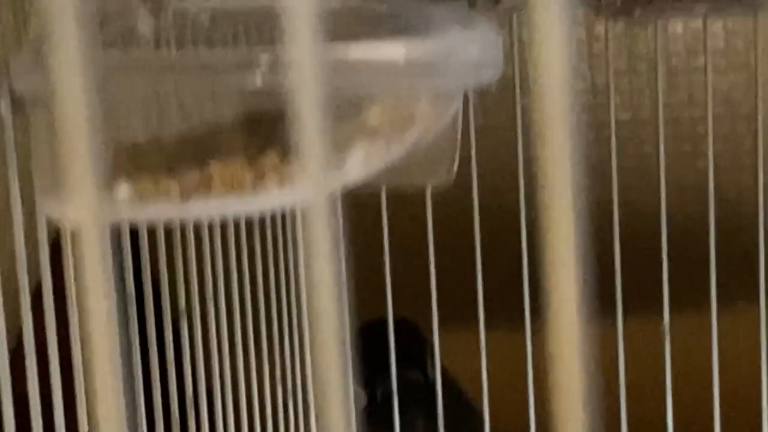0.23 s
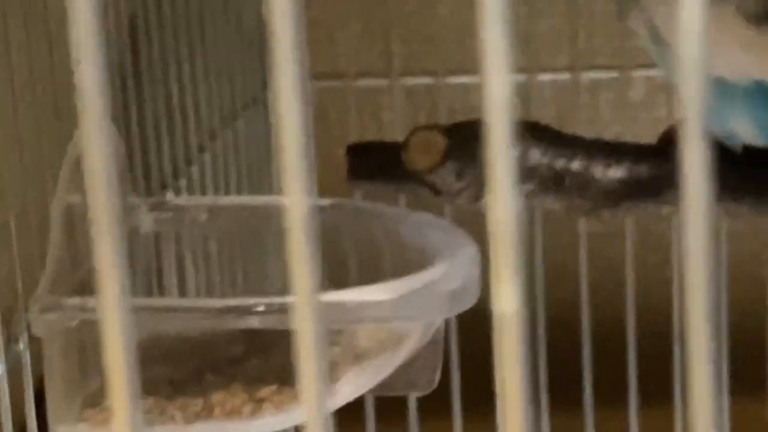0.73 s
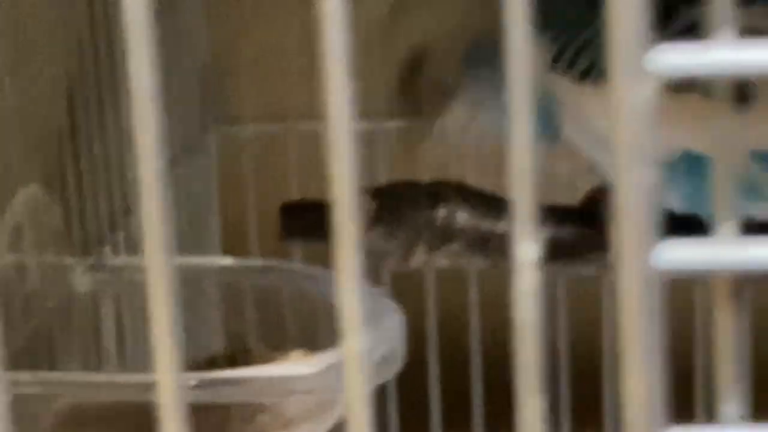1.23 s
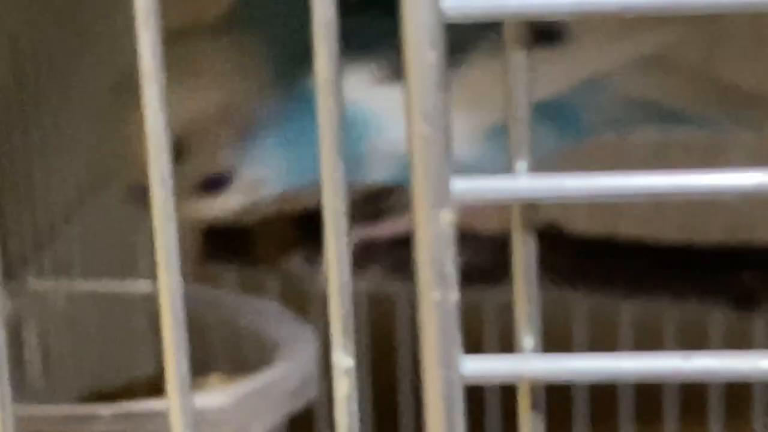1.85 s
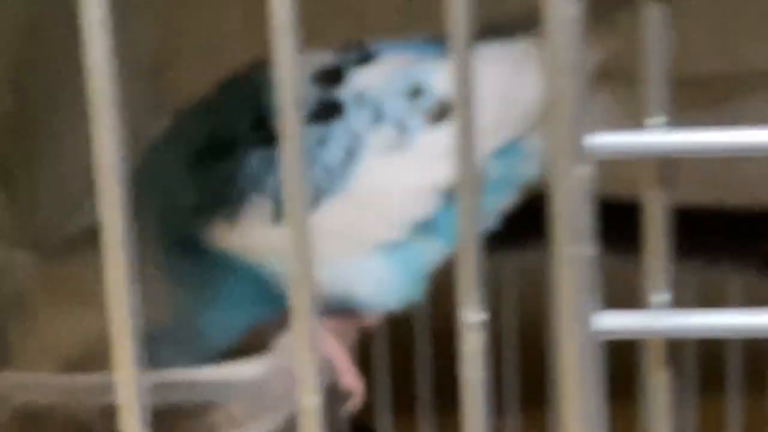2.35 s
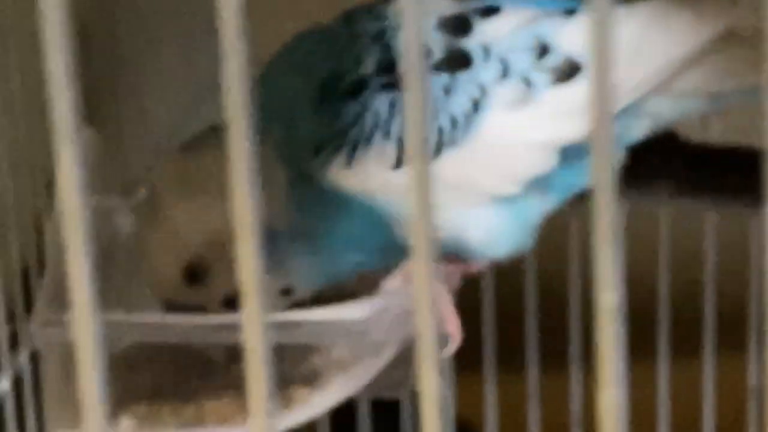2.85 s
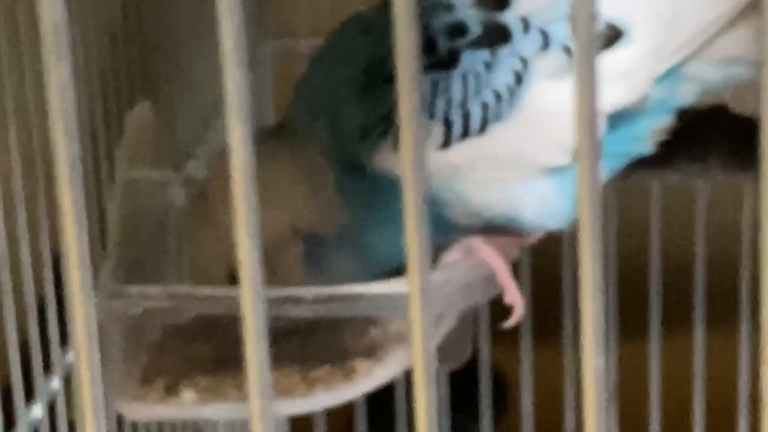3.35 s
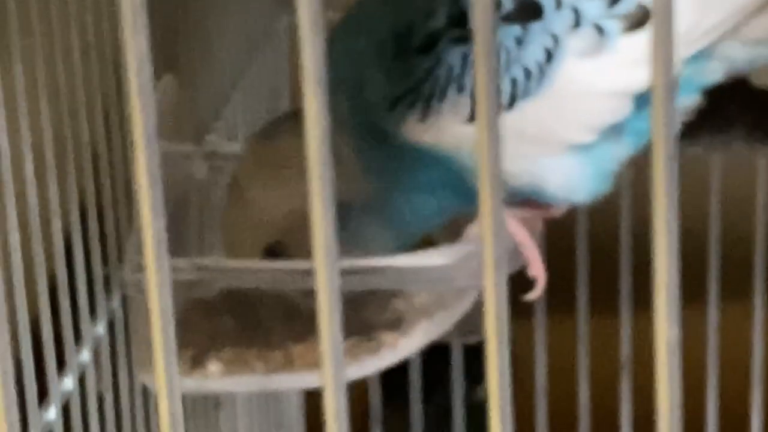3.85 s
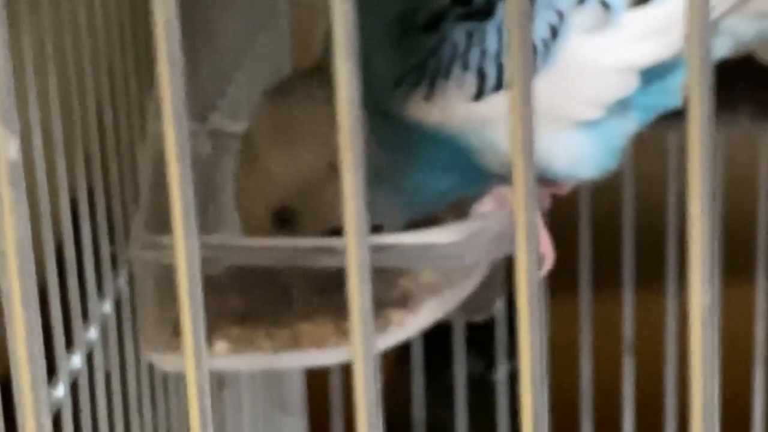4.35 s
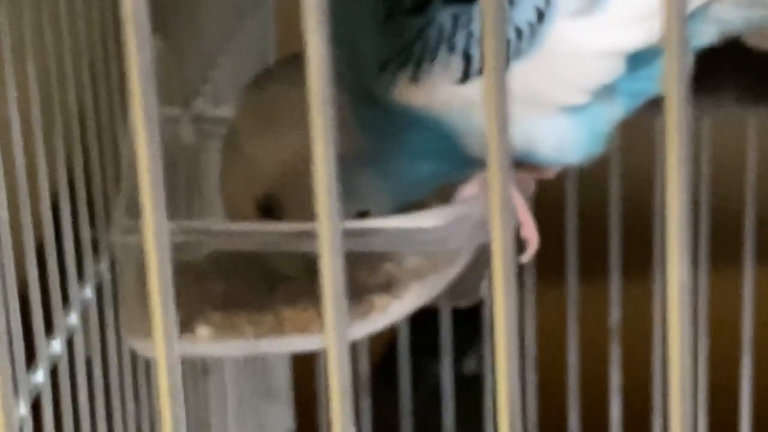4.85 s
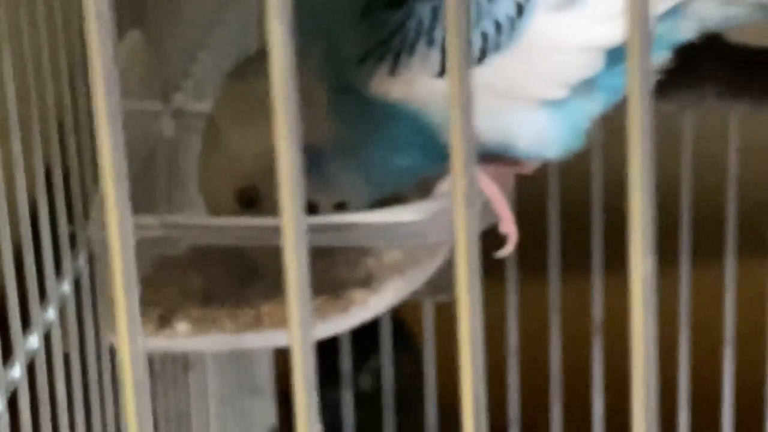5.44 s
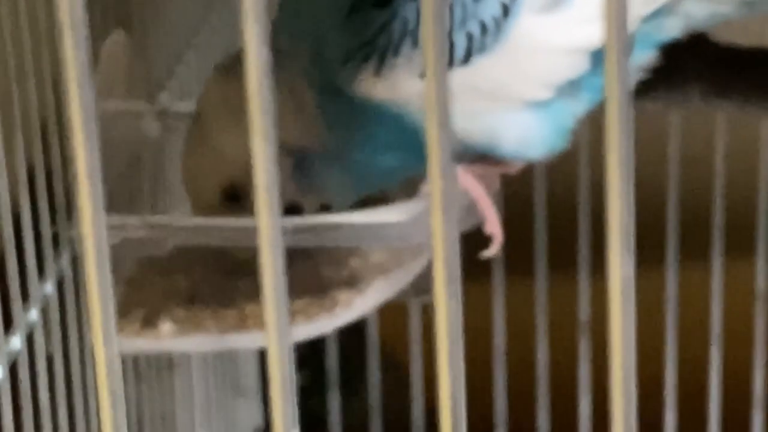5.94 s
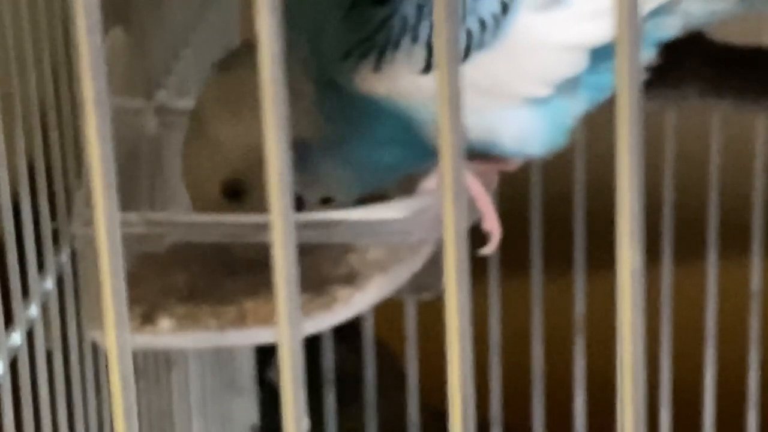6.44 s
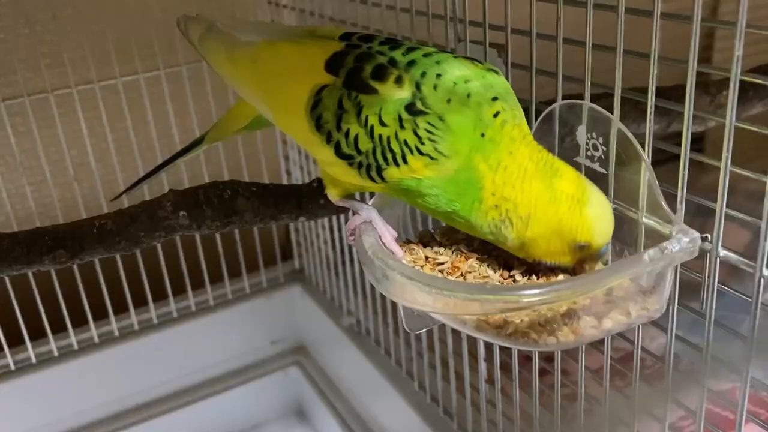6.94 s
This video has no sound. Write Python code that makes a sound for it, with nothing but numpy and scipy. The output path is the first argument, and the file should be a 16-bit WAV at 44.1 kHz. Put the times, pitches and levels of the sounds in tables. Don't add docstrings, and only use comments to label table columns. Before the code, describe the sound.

A quiet home room with faint, lumpy low rumble, heard from a phone close to a wire cage. From 0.2 s claws shuffle and wire walls knock and buzz lightly, with more rattles at 0.7-0.9 s. At 1.02 s a hard metallic clank lands with two tiny harsh, raspy squawks, the second louder and brighter at about 1.17 s, followed by a rush of sliding seed. Another strong cage knock comes at 1.5 s. Around 1.9-2.7 s crisp husk crackles, small wire knocks and claw scuffles mix. Then feeding: irregular sharp beak taps on thin plastic, strong near 3.05, 4.36 and 6.3 s, with light nibbles, ticks and short seed drags between. Tray thumps at 5.44 and hardest at 5.53 s leave a low hum; firm knocks follow at 5.97 and 6.26 s. The rumble drops after 6.9 s, with a last bright knock and seed rustle at 7.1 s.

```python
import sys
import numpy as np
from scipy import signal
from scipy.fft import rfft, irfft
from scipy.io import wavfile
from scipy.ndimage import uniform_filter1d

SR = 44100
rng = np.random.default_rng(int(sys.argv[2]) if len(sys.argv) > 2 else 0)


def to_linear_factor(level_db):
    exponent = np.asarray(level_db, float) / 20
    return 10 ** exponent


def output_pcm(signal):
    pcm = np.clip(np.atleast_2d(signal).T, -1, 1) * 32767
    wavfile.write(sys.argv[1], SR, np.round(pcm).astype(np.int16))


N = 316638

# f/Hz, level/dB [dB per Hz]
HUSK_SPECTRUM = [(5000, -32), (7500, -7), (9000, -3), (12000, -4), (14000, -6.5), (15600, -4), (16300, -20),
                 (16800, -39)]
# f/Hz, width/Hz, level/dB
WIRE_MODES = [(578, 53, -4.5), (763, 91, 0), (966, 30, -9), (1214, 53, 0), (1560, 92, -10.5),
              (1790, 150, -3), (2630, 50, 0.5), (3030, 61, 2.5), (3282, 35, 3), (3710, 78.5, -1.5),
              (4720, 60, 0.5), (2039, 15, -2.5), (2500, 22, -2), (3490, 35, 0)]
# f/Hz, width/Hz, level/dB
TRAY_MODES = [(336.3, 31, 2), (569, 29, 3), (1017, 76, -9), (1189, 98, 0), (1696, 31, -8), (2160, 39, -10),
              (2620, 28, -0.5), (3066, 45, -11), (4680, 56, -2), (957, 39, -2), (1367, 24, -6),
              (3500, 52, -6), (763, 28, -7.5)]


def evened(x):
    return x / np.sqrt(np.mean(x ** 2) + 1e-20)


def read(points, hz):
    f, value = np.transpose(points)
    return np.interp(np.log(hz + 1), np.log(f + 1), value)


def curve(rows, size, start):
    s, *columns = np.transpose(rows)
    return [np.interp(start + np.arange(size) / SR, s, c) for c in columns]


def add(mix, s, sound):
    part = mix[..., round(s * SR):][..., :sound.shape[-1]]
    part += sound[..., :part.shape[-1]]


def coloured(x, points):
    gain_db = np.maximum(read(points, abs(np.fft.fftfreq(4096, 1 / SR))), -90)
    log_gain = np.log(to_linear_factor(gain_db))
    taps = np.fft.ifft(np.exp(np.conj(signal.hilbert(log_gain)))).real[:2048]
    return signal.oaconvolve(x, taps / np.linalg.norm(taps))[:len(x)]


def resonate(x, hz, width):
    r = np.exp(-np.pi * width / SR)
    if np.ndim(hz) == 0:
        pull = r * np.cos(2 * np.pi * hz / SR)
        return signal.lfilter([2 * (1 - r), -2 * (1 - r) * pull], [1, -2 * pull, r ** 2], x)
    turn = np.exp(2j * np.pi * np.cumsum(hz) / SR)
    return 2 * (turn * signal.lfilter([1 - r], [1, -r], x / turn)).real


def body(x, modes):
    return sum((-1) ** k * to_linear_factor(db) * resonate(x, hz, width) for k, (hz, width, db) in enumerate(modes))


def lumps(size, count):
    smooth = uniform_filter1d(rng.standard_normal(size), count)
    return evened(uniform_filter1d(smooth, count))


def grains(per_s, spread_db, hiss):
    size = to_linear_factor(spread_db * np.minimum(rng.exponential(1, N), 5)) * rng.choice([-1., 1.], N)
    clicks = size * (rng.random(N) < per_s / SR)
    return evened(evened(clicks) + hiss * rng.standard_normal(N))


def moves():
    # t/s, length/s, claws on tray level/dB, jolt through the stand level/dB
    shifts = [(0.195, 0.4, -68, -59.5), (0.793, 0.31, -65, -59.5), (1, 0.24, -62, -67),
              (1.268, 0.39, -58.5, -55), (1.694, 0.35, -69, -75), (1.915, 0.3, -60.5, -55),
              (2.159, 0.37, -61.5, -61), (2.562, 0.15, -71, -63), (2.665, 0.61, -71.5, -57.5),
              (3.188, 0.19, -59.5, -54), (3.301, 0.37, -60, -51.5), (3.837, .1, -83.5, -52.5),
              (3.943, 0.2, -67, -65), (4.244, 0.18, -73.5, -78), (5.423, 0.32, -57, -59.5),
              (5.826, 0.17, -78.5, -55), (5.976, 0.56, -68, -61), (6.905, 0.17, -72.5, -73),
              (7.107, .1, -68, -75), (5.03, 0.095, -70.5, -77.5)]
    rise_s, fade_db = 0.018, -10
    out = np.zeros((2, N))
    for s, length, claws_db, jolt_db in shifts:
        t = np.arange(round(1.5 * length * SR)) / SR
        shape = np.clip(np.minimum(t / rise_s, (1.3 - t / length) / 0.31), 0, 1)
        shape = shape * to_linear_factor(fade_db * t / length)
        add(out, s, to_linear_factor(np.array([[claws_db], [jolt_db]])) * shape)
    return out


def background():
    # f/Hz, level/dB [dB per Hz]
    rumble_spectrum = [(12, -51), (20, -22), (44, -2.5), (68, 1), (123, -6.5), (157, -20), (325, -28),
                       (387, -32), (500, -28.5), (650, -54.5), (1100, -120)]
    # f/Hz, level/dB [dB per Hz]
    scuffle_spectrum = [(71, -33.5), (120, 0.5), (220, -4), (550, -13.5), (637, -17), (738, -8.5),
                        (884, -12.5), (1540, -17.5), (3440, -34), (6000, -53.5), (7800, -67.5),
                        (13200, -120)]
    still_rumble_db, still_tray_db = -63, -80
    quiet_from_s, quiet_db = 6.88, -13
    claws, jolts = moves()
    quieting = np.clip((np.arange(N) / SR - quiet_from_s) / 0.083, 0, 1)
    house = to_linear_factor(still_rumble_db + quiet_db * quieting)
    noise = rng.standard_normal((4, N))
    rumble = [coloured(n, rumble_spectrum) * np.hypot(house, jolts) * to_linear_factor(1.6 * lumps(N, count=1500))
              for n in noise[:2]]
    scuffle = np.array([coloured(n + 0.2 * evened(body(n, WIRE_MODES[:6])), scuffle_spectrum)
                        for n in noise[2:]])
    scuffle = scuffle * np.hypot(to_linear_factor(still_tray_db), claws) * to_linear_factor(1.5 * lumps(N, count=700))
    return rumble + scuffle


def hum(s, length, db, fade_db, modes):
    size = round(length * SR)
    level = to_linear_factor(db + fade_db * np.arange(size) / size + 4.2 * lumps(size, count=500))
    level = level * signal.windows.tukey(size, .05)
    buzz = []
    for n in rng.standard_normal((2, size)):
        once = body(n, modes)
        narrow = evened(body(once, modes))
        buzz.append(evened(narrow + .5 * evened(once)) * level)
    return s, np.array(buzz)


def loose_parts():
    # f/Hz, width/Hz, level/dB
    bars = [(245, 110, 1), (680, 38, 3.5), (765, 60, 2.5), (1490, 65, -2), (1590, 37, -3), (1860, 30, -13),
            (2600, 84, -4)]
    starts = [.195, 1.775, 1.254, 2.895, 5.45, 5.968, 5.44]
    # length/s, level/dB, fade level/dB
    hums = [
        (0.091, -65, -7),
        (0.071, -60.5, -12),
        (0.32, -56.5, -8),
        (.08, -71, -16),
        (.6, -64, -16),
        (0.2, -61, -16.5),
        (.5, -58.5, -16),
    ]
    parts = bars[1:], bars[1:], bars, bars[3:5], TRAY_MODES[2:4], TRAY_MODES[1:2], TRAY_MODES[:1]
    out = np.zeros((2, N))
    for s, row, modes in zip(starts, hums, parts):
        add(out, *hum(s, *row, modes))
    return out


def seeds():
    # f/Hz, level/dB [dB per Hz]
    seed_spectrum = [(700, -41), (1200, -8.5), (1700, -1.5), (2190, 0.5), (2600, -6.5), (5000, -5),
                     (8000, -11), (9500, -42.5)]
    # t/s, length/s, seed level/dB, husk fizz level/dB
    shuffles = [(1.936, 0.11, -65, -78), (0.856, 0.11, -71, -88), (0.24, 0.9, -88, -89),
                (0.594, 0.56, -85, -99), (2.722, 0.074, -71, -81), (2.877, 0.1, -75.5, -85.5),
                (4.01, 0.094, -73, -86), (4.361, 0.081, -72.5, -79), (5.29, 0.21, -76.5, -87),
                (5.55, 0.051, -83, -90), (6.36, 0.088, -74, -89), (1.073, 0.1, -58, -92),
                (1.18, 0.36, -53.5, -76), (1.685, 0.47, -74, -78), (1.917, 0.082, -67.5, -56),
                (2.061, 0.059, -75, -60.5), (2.129, 0.11, -64, -70), (2.279, 0.11, -55.5, -77),
                (3.271, 0.12, -63.5, -92), (3.624, 0.042, -68.5, -70.5), (3.799, 0.089, -69.5, -79.5),
                (3.886, 0.061, -69, -81), (4.183, 0.11, -65, -75), (4.51, 0.1, -66, -74.5),
                (4.702, 0.054, -100, -80), (4.847, 0.059, -74, -72.5), (4.959, 0.16, -70, -76),
                (5.53, 0.024, -80, -69), (5.66, 0.086, -68, -69), (5.866, 0.042, -67.5, -79),
                (6.039, 0.059, -58, -72), (6.159, 0.075, -66.5, -72), (6.305, 0.029, -66.5, -74),
                (6.531, 0.072, -63, -79), (6.711, 0.064, -71, -87), (6.897, 0.17, -66.5, -69),
                (7.098, 0.086, -57.5, -61.5)]
    still_wires_db, rustle_db, hiss_db = -87, -24.5, -89
    stir = to_linear_factor(still_wires_db) + to_linear_factor(rustle_db) * moves()[0]
    fizz = np.full(N, to_linear_factor(hiss_db))
    for s, length, seed_db, husk_db in shuffles:
        t = np.arange(round(length * SR)) / SR
        drag = signal.windows.tukey(len(t), .5) * to_linear_factor(4.5 - 17.0 * t / length)
        add(stir, s, to_linear_factor(seed_db - 9.0) * drag)
        add(fizz, s, to_linear_factor(husk_db - 2.5) * drag)
    flicker = to_linear_factor(1.6 * np.array([lumps(N, count=500), lumps(N, count=500)]))
    slide = grains(900, 3.5, hiss=4.4)
    slide = slide + 0.14 * evened(body(slide, WIRE_MODES[5:]))
    crackle = grains(1200, 3.0, hiss=2.2)
    sliding = flicker[0] * coloured(slide, seed_spectrum) * stir
    return sliding + flicker[1] * coloured(crackle, HUSK_SPECTRUM) * fizz


def knocks(events, modes, share):
    # f/Hz, level/dB [dB per Hz]
    thud_spectrum = [(150, -25.5), (400, -14), (540, -0.5), (1000, 1.5), (1700, 0.5), (2200, -6),
                     (3200, -28.5), (5000, -69)]
    # f/Hz, level/dB [dB per Hz]
    clang_spectrum = [(1200, -42.5), (2200, -3), (2700, -4), (4000, -5), (5500, -11.5), (7500, -17.5),
                      (9000, -46.5)]
    choke_db, choke = -41.5, 0.24
    t = np.arange(17000) / SR
    dull, ringing = np.zeros((2, 2, 2, N))
    ring_slope, ring_db = np.array([[0.55, 0.4], [0.1, 2.5]])[:, :, None, None]
    noises = rng.standard_normal((len(events), 2, 2, len(t)))
    for (s, db, treble_db, t60, hz), noise in zip(events, noises):
        unevenness = 2.0 * lumps(len(t), count=200) * np.minimum(t / 0.018, 1)
        blow = noise * np.minimum(t / 0.0008, 1) * to_linear_factor(db + unevenness)
        blow[1] *= to_linear_factor(treble_db - 60 * t / 0.42)
        ring = share * to_linear_factor(-choke * max(db - choke_db, 0))
        fall_db = -60 * t / t60
        fall = to_linear_factor(fall_db) + 0.5 * to_linear_factor(8.0 * fall_db)
        add(dull, s, blow * fall * (1 - 0.47 * np.clip(ring, 0, 1)))
        add(ringing, s, blow * to_linear_factor(ring_slope * fall_db + ring_db) * ring)
        add(dull[0], s, 8.1 * ring * resonate(blow[0] * to_linear_factor(1.1 * fall_db), hz, 70))
    rung = dull + 6.25 * body(ringing, modes)
    return to_linear_factor(-10.5) * np.array([coloured(low, thud_spectrum) + coloured(high, clang_spectrum)
                                  for low, high in zip(*rung)])


def cage_blows():
    # t/s, peak level/dB, treble level/dB, rattle t60/s, struck tone f/Hz
    wall_blows = [(0.263, -42.5, -10, 0.13, 1480), (0.448, -61, -4, 0.18, 1310),
                  (0.703, -56.5, -6.5, 0.22, 945), (0.801, -47, -22, 0.12, 1360),
                  (0.861, -54.5, -3.5, 0.25, 976), (0.864, -55, -14, 0.25, 580),
                  (0.27, -57, -4.5, 0.3, 770), (0.355, -67, -8, .15, 1190), (1.023, -26, -6.5, 0.081, 1430),
                  (1.524, -29.5, -13, 0.053, 1582), (1.936, -48.5, -9, 0.063, 572),
                  (2.164, -46.5, -7.5, 0.093, 665), (2.232, -51.5, -9.5, 0.13, 1450),
                  (2.291, -47.5, -3.5, 0.12, 560), (2.417, -58, -6.5, 0.21, 1470),
                  (2.489, -57, -15, 0.055, 557), (2.663, -55, -7.5, 0.36, 577),
                  (1.305, -52, -11, 0.18, 2600), (1.785, -59, -23, 0.1, 754), (2.355, -59, -5, 0.1, 1450),
                  (2.465, -60, -3.5, 0.09, 2050), (2.562, -60, -13, 0.19, 2084),
                  (2.828, -61, -11, 0.25, 2060), (2.893, -59, -15, 0.14, 1590), (2.93, -64, -9, 0.067, 960),
                  (3.9255, -46.5, -7.5, 0.16, 1590)]
    # t/s, peak level/dB, treble level/dB, rattle t60/s, struck tone f/Hz
    tray_blows = [
        (3.2, -57, -26, 0.14, 564),
        (5.44, -50.5, -19.5, 0.39, 329.6),
        (5.531, -42.5, -24, .12, 530),
        (3.41, -56, -20, .15, 540),
        (5.436, -40, -5, 0.24, 1320),
        (5.528, -29, -21, 0.064, 1590),
        (5.967, -43, -11.5, 0.18, 1350),
        (6.258, -45.5, -17.5, 0.15, 1400),
        (6.425, -51, -23, 0.13, 1244),
        (7.112, -44.5, -1.5, 0.078, 2160),
    ]
    return knocks(wall_blows, WIRE_MODES, share=0.4) + knocks(tray_blows, TRAY_MODES, share=0.36)


def pecks():
    # f/Hz, level/dB [dB per Hz]
    cup_spectrum = [(400, -33), (900, -16.5), (1500, -6.5), (1900, -2), (3000, -3), (5000, -2), (7500, -8),
                    (9500, -27.5)]
    # t/s, peak level/dB, husk snap level/dB, cup tone f/Hz, thinness of the snap level/dB
    hard_pecks = [(1.022, -44, -69, 5590, -9), (1.9105, -52.5, -57.5, 5400, .1), (1.937, -51, -38, 3400, 2),
                  (2.0625, -65, -51, 3580, 1), (2.095, -55, -64.5, 5370, -5),
                  (2.1235, -61, -43.5, 6800, -1), (2.7095, -49, -53, 4170, 2),
                  (3.047, -36.5, -52.5, 4200, 2), (3.0809, -38.5, -50, 3720, .1),
                  (4.0305, -52.5, -53, 3520, -2), (4.3592, -36, -44, 3600, 3), (4.406, -49, -69, 1684, 3.),
                  (4.7875, -43, -54, 3600, 2.5), (5.2605, -48, -59.5, 4680, 3.5),
                  (5.2845, -42.5, -60.5, 2900, 3.), (6.02, -44.5, -65, 2550, .1),
                  (6.3, -32, -47.5, 2536, 0), (6.3455, -43, -48, 3800, 1.5), (6.3545, -43, -71, 2900, .1),
                  (6.4766, -53, -56.5, 4350, 5.), (6.483, -44, -51.5, 5600, .1),
                  (6.5099, -41.5, -50, 4500, -6), (6.8295, -56, -54.5, 3760, 2),
                  (6.8408, -46.5, -55.5, 3580, .1)]
    # t/s, peak level/dB, husk snap level/dB, tone f/Hz
    ticks = [(1.358, -48, -63, 5500), (1.425, -51.5, -62.5, 6450), (1.927, -46, -62.5, 4800),
             (2.7445, -67, -65, 6540), (2.801, -68, -72.5, 5510), (2.979, -68, -80, 5500),
             (3.004, -64, -78, 3800), (3.015, -64, -76, 4500), (3.355, -68, -70, 7500),
             (3.408, -73, -86, 5500), (3.485, -74.5, -80, 6000), (3.63, -62.5, -72, 7530),
             (4.0097, -63, -63, 3500), (4.0775, -69.5, -72, 3500), (4.095, -68, -85, 3000),
             (4.295, -66, -85, 3000), (4.314, -72, -73.5, 6000), (4.575, -68, -74, 4500),
             (4.7, -80, -76, 6000), (4.716, -74, -75, 6000), (4.914, -71, -71, 6000),
             (.998, -66, -85, 6500), (4.857, -65, -71, 3790), (5.104, -70, -80, 3000),
             (5.294, -59, -71, 3500), (5.3397, -62, -74, 2200), (5.377, -68, -73, 5940),
             (5.415, -63, -70, 4000), (5.724, -74, -69, 4500), (5.762, -81, -74, 5040),
             (6.049, -58, -63, 3500), (6.728, -65, -74, 2500), (6.811, -77, -75, 6020),
             (6.906, -68, -64.5, 5000)]
    # t/s, peak level/dB, husk snap level/dB
    nibbles = [(1.124, -56, -74), (1.735, -61, -68.5), (1.8535, -60.5, -62), (2.196, -63.5, -68),
               (2.5994, -79, -69.5), (2.6971, -52.5, -61), (3.076, -55, -49), (3.1714, -62, -66),
               (3.2545, -57, -73), (3.803, -64, -63), (3.894, -62, -66), (4.27, -58.5, -91),
               (4.347, -56, -66), (5.325, -60, -79), (5.528, -63, -70.5), (6.412, -55.5, -71),
               (6.5405, -61, -61.5), (6.6352, -69.5, -74), (6.7351, -53, -66), (7.019, -65.5, -56.5)]
    # t/s, peak level/dB, bowl tone f/Hz
    touches = [
        (2.667, -67.5, 2660),
        (4.2065, -62.5, 2300),
        (4.52, -56, 2160),
        (5.0419, -57, 2120),
        (5.674, -51.5, 2153),
        (6.0466, -52, 2085),
        (6.1792, -54.5, 2190),
    ]
    nibble_hz, snap_lag_s = 1720, .002
    t, cup, husk = np.arange(4000) / SR, np.zeros(N), np.zeros(N)
    blows = hard_pecks + [(*row, 0) for row in ticks] + [(*row, nibble_hz, 0) for row in nibbles]
    shape = to_linear_factor(-60 * t / 0.024) + to_linear_factor(-25.0 - 60 * t / 0.19)
    noises = rng.standard_normal((len(blows), 2, len(t)))
    for (s, db, snap_db, hz, thin_db), noise in zip(blows, noises):
        burst = noise * shape * to_linear_factor(2.0 * lumps(len(t), count=30))
        burst[:, 0] = 7.0
        add(cup, s + 0.0027, to_linear_factor(db - 11.5) * (burst[0] + 2.1 * resonate(burst[0], hz, 680)))
        thin = burst[1] + (to_linear_factor(thin_db) - 1) * resonate(burst[1], 14800, 2840)
        add(husk, s + snap_lag_s, to_linear_factor(snap_db + 1 - 60 * t / 0.12) * thin)
    for (s, db, hz), noise in zip(touches, rng.standard_normal((len(touches), len(t)))):
        touch = noise * to_linear_factor(db - 60 * t / 0.056) * np.minimum(t / 0.0023, 1)
        bowl = resonate(resonate(touch, hz, 420), hz, 420)
        add(cup, s, to_linear_factor(9.0) * bowl + to_linear_factor(-9.0) * touch)
    return coloured(cup, cup_spectrum) + coloured(husk, HUSK_SPECTRUM)


def squawk(rows, slack_hz, strained_hz):
    # f/Hz, width/Hz, level/dB
    partials = [(1150, 300, 6), (2300, 420, 5.5), (3096, 190, 1.5), (3800, 239, 3), (4550, 170, -0.5),
                (5260, 120, 4.5), (5750, 170, -1.5), (6350, 490, 2), (8140, 1000, 2.5)]
    # f/Hz, width/Hz, level/dB
    throat_modes = [(1360, 1700, 0.5), (2620, 2580, 6.5), (7400, 1000, -21)]
    shut_hz, throat_db_per_khz = 4500, -7.5
    strain_db, strain_span_db, merge_db = -36, 7.5, -25
    tone_db, grunt_db, shrill_db = -4.5, -8, -21.5
    start = rows[0][0]
    size = round((rows[-1][0] - start) * SR)
    effort_db, beak_hz = curve(rows, size, start)
    throat_db = throat_db_per_khz * (beak_hz - shut_hz) / 1000

    turns = np.cumsum(310 * (1 + 0.34 * lumps(size, count=120))) / SR
    merging = np.clip((np.maximum.accumulate(effort_db) - merge_db) / 5, 0, 1)
    bursts = 0.2 + np.exp(-(turns % 1) / (0.22 + 1.5 * merging))
    air = rng.standard_normal((2, size)) * bursts

    rasp = evened(body(air[0], partials)) + .25 * evened(air[0])
    strain = np.clip((effort_db - strain_db) / strain_span_db, 0, 1)
    pitch = slack_hz + (strained_hz - slack_hz) * strain
    rasp = rasp + to_linear_factor(tone_db) * evened(sum(resonate(air[1], k * pitch, 150) for k in range(1, 6)))

    beak = evened(resonate(resonate(rasp, beak_hz, 1900), beak_hz, 1900))
    voice = beak + to_linear_factor(throat_db) * evened(body(rasp, throat_modes))
    voice = voice / np.sqrt(1 + to_linear_factor(2 * throat_db))
    grunt = evened(resonate(air[0], .92 * pitch, 180))
    voice = voice + to_linear_factor(grunt_db) * (1 - strain) * grunt
    voice = voice / np.sqrt(uniform_filter1d(voice ** 2, size=260))
    voice = signal.lfilter(*signal.butter(6, 8600, fs=SR), np.tanh(voice / 2.4) * 2.6)
    voice = voice + to_linear_factor(shrill_db) * evened(coloured(air[1], HUSK_SPECTRUM))
    return start, to_linear_factor(effort_db) * voice * signal.windows.tukey(size, .1)


def parrot():
    # t/s, effort level/dB, beak resonance f/Hz
    squawks = [
        [(1.04, -56.5, 5500), (1.049, -43, 5550), (1.052, -28, 5300), (1.057, -32, 4940), (1.061, -37.5, 4450),
         (1.072, -59.5, 4000)],
        [(1.144, -50.5, 4500), (1.154, -37, 4900), (1.163, -28.5, 5500), (1.173, -17, 5900), (1.184, -22, 5700),
         (1.196, -22, 5520), (1.2, -33, 4960), (1.211, -37.5, 4598), (1.216, -47, 4500)],
    ]
    # slack f/Hz, strained f/Hz
    pitches = [(1810, 1910), (1210, 1560)]
    voice = np.zeros(N)
    for rows, pitch in zip(squawks, pitches):
        add(voice, *squawk(rows, *pitch))
    return signal.lfilter(*signal.butter(3, 800, "high", fs=SR), voice)


def room(x):
    # f/Hz, t60/s
    decay = [(200, 0.5), (1000, 0.44), (3000, 0.36), (6000, 0.14), (12000, 0.36)]
    taps = np.zeros((2, SR))
    slots = np.arange(300, SR - 20, 20)
    at = slots + rng.integers(0, 20, (2, len(slots)))
    np.put_along_axis(taps, at, rng.choice([-1., 1.], at.shape), 1)
    hz, t, z = signal.stft(taps, SR, nperseg=256)
    tail = signal.istft(z * to_linear_factor(-60 * t / read(decay, hz)[:, None]), SR, nperseg=256)[1]
    return signal.fftconvolve(x[None], tail / np.linalg.norm(tail[0]), axes=1)[:, :N]


def wide(x, y):
    # f/Hz, left-right likeness [0 to 1]
    likeness = [(30, 1), (130, 0.96), (300, .78), (700, 0.8), (1300, 0.32), (2200, 0.82), (3500, 0.97),
                (5000, 1)]
    same = np.clip(read(likeness, np.fft.rfftfreq(N, 1 / SR)), 0, 1)
    mid = rfft(x) * np.sqrt((1 + same) / 2)
    side = rfft(y) * np.sqrt((1 - same) / 2)
    return irfft([mid + side, mid - side], N)


def ports(pair):
    # f/Hz, phase [half turns]
    port_lead = [(500, 0), (1300, .13), (2500, .07), (7450, -.03), (7800, -.36), (8790, -.92),
                 (9560, -1.21), (10800, -1.91), (11500, -2.13), (12900, -2.83), (13700, -3.17),
                 (14800, -3.85), (15500, -4.04), (17000, -4)]
    lead = np.exp(.5j * np.pi * read(port_lead, np.fft.rfftfreq(N, 1 / SR)))
    return irfft(rfft(pair) * [lead, 1 / lead], N)


def scene():
    cage = loose_parts() + cage_blows()
    taps = pecks()
    voice = parrot()
    tails = room(to_linear_factor(-20.0) * voice + to_linear_factor(-20.5) * taps + to_linear_factor(-7.0) * cage[0])
    return voice + taps + seeds() + wide(*(cage + tails + background()))


def band_limit(x):
    return signal.sosfilt(signal.butter(12, 16840, fs=SR, output="sos"), x)


def record(dry):
    edge = signal.firwin(511, 16850, window=("kaiser", 9), fs=SR)
    mix = signal.oaconvolve(ports(dry), edge[None], "same")
    return band_limit(mix)


dry = scene()
out = record(dry)
output_pcm(out)
```